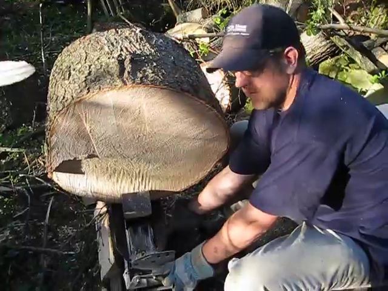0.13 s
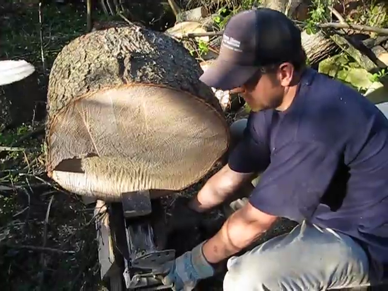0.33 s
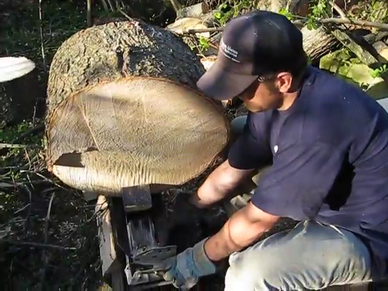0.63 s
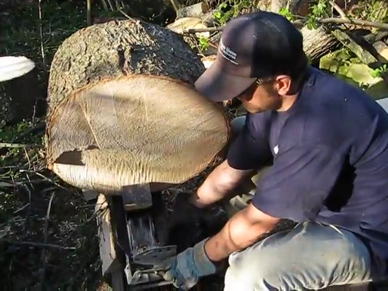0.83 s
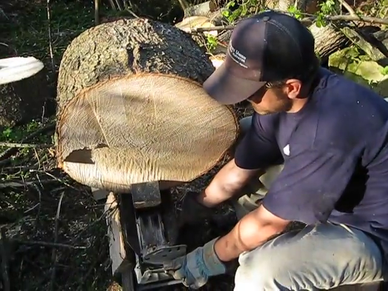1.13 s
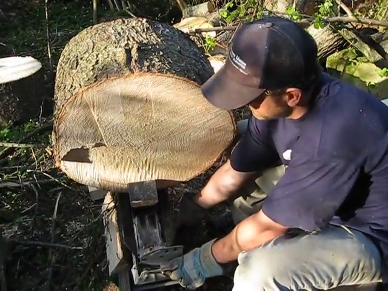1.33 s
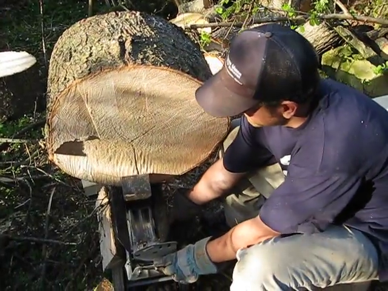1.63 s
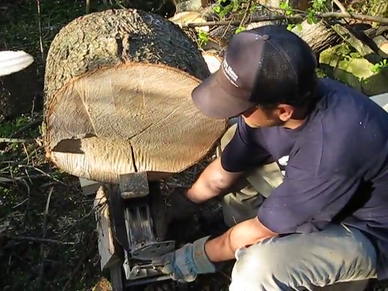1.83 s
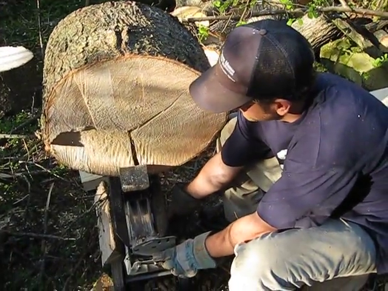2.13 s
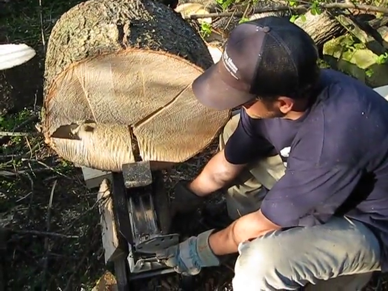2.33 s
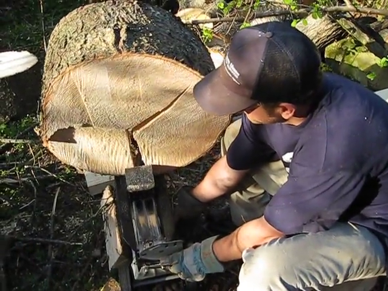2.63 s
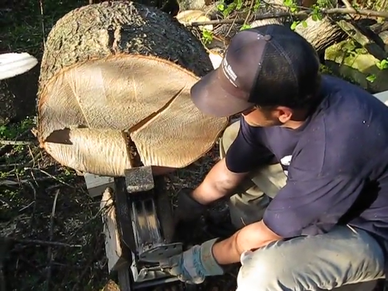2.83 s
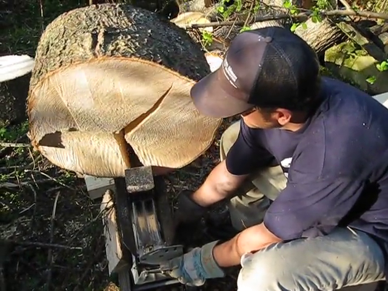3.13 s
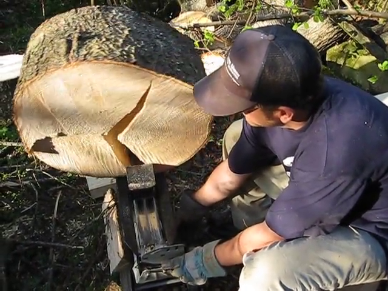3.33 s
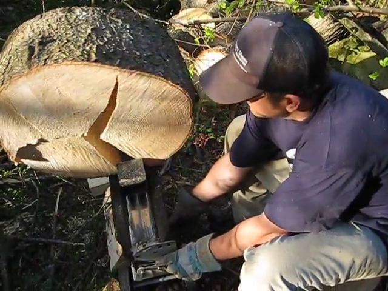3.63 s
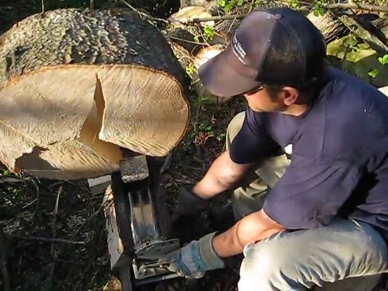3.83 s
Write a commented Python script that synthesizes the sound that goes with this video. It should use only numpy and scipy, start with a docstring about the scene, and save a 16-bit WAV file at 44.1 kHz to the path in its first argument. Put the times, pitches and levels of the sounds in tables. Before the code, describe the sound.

Log splitter pump whirs and rattles while a large log splits with sharp cracks and knocks

```python
"""A motor hum comes in over the low rush of a yard: an electric log splitter starts up.
Its gear pump spins up, whines and rattles as oil rushes through, then runs down; all follow one turning shaft.
The wedge tears a big log open: noise bursts and rings make sharp cracks, dull knocks and a short groan.
Dense random clicks make the crackle of fibres. The recorder's gain control ducks the sound after loud cracks."""
import sys
import numpy as np
from scipy import signal
from scipy.fft import rfft, irfft
from scipy.io import wavfile
from scipy.ndimage import uniform_filter1d, minimum_filter1d, map_coordinates

SR = 44100
rng = np.random.default_rng(int(sys.argv[2]) if len(sys.argv) > 2 else 0)


def bounce(signal):
    """Save signal as a 16-bit WAV file at the path given by the first command-line argument."""
    frames = np.transpose(np.atleast_2d(signal))
    limited = np.clip(frames, -1, 1)
    pcm = np.round(limited * 32767).astype(np.int16)
    wavfile.write(sys.argv[1], SR, pcm)


N = 176400  # samples in 4 seconds


def undb(db):
    """Turn decibels into a gain."""
    return 10 ** (np.asarray(db) / 20)


def unit(x):
    """Scale to an average (rms) level of 1."""
    return x / np.sqrt(np.mean(x ** 2))


def curve(rows, axis=1):
    """Join one column of a table by straight lines in time, holding the end values."""
    rows = np.array(rows)
    return np.interp(np.arange(N) / SR, rows[:, 0], rows[:, axis])


def colour(x, points):
    """Filter a sound to the given (Hz, dB) curve without any sound before its cause (minimum phase)."""
    size = 4096
    hz, db = np.array(points).T
    f = np.maximum(np.fft.rfftfreq(size, 1 / SR), 1)
    gain = undb(np.interp(np.log(f), np.log(hz), db))
    # folding the cepstrum forward in time gives the minimum-phase filter
    cepstrum = irfft(np.log(gain))
    cepstrum[1:size // 2] *= 2
    cepstrum[size // 2 + 1:] = 0
    impulse = irfft(np.exp(rfft(cepstrum)))
    return signal.fftconvolve(x, impulse)[:len(x)]


def ring(x, hz, width_hz):
    """Pass a sound through one resonance."""
    return signal.lfilter(*signal.iirpeak(hz, hz / width_hz, fs=SR), x)


def low_pass(x, hz, order):
    """Keep what lies below a frequency."""
    return signal.sosfilt(signal.butter(order, hz, fs=SR, output="sos"), x)


def noise():
    """White noise as long as the scene."""
    return rng.standard_normal(N)


def walk(rate):
    """Smooth random drift with an rms of 1, from this many new random values a second."""
    k = int(SR / rate)
    steps = np.repeat(noise()[:N // k + 1], k)
    smooth = uniform_filter1d(uniform_filter1d(steps, k), k)
    return unit(smooth[:N])


def waver(hz, width_hz):
    """A rough, unsteady ring: two slow noises carry the sine and cosine of a moving pitch."""
    phase = 2 * np.pi * np.cumsum(hz) / SR
    slow = lambda: unit(low_pass(noise(), width_hz, order=2))
    return slow() * np.sin(phase) + slow() * np.cos(phase)


def wood_ring(hz, width, t):
    """A ringing piece of wood whose phase strays at random, blurring its pitch by a share of itself."""
    stray = np.cumsum(rng.standard_normal(len(t))) * np.sqrt(2 * np.pi * width * hz / SR)
    return np.sqrt(2) * np.sin(2 * np.pi * hz * t + uniform_filter1d(stray, size=20))


# Whine at twice the gear mesh rate. Each row: time in seconds, level in dB before the resonance.
WHINE_LEVEL = [(.2, -70), (.24, -33), (.31, -40.5), (.34, -23), (.45, -22), (.56, -11), (.7, -8.5),
               (.92, -17.5), (1.28, -15), (1.42, -20.5), (1.62, -17), (1.85, -18.5), (2.5, -21),
               (2.84, -19.5), (3.1, -28), (3.65, -29.5), (3.82, -26.5), (3.885, -23.5), (3.95, -30),
               (4.0, -20)]
WHINE_PEAK_HZ, WHINE_WIDTH_HZ = 909, 268  # the resonance that picks out the whine
THIRD_DB = -12.5  # tone at three times the mesh rate, against the second, before the resonance
WHINE_FLUTTER_DB, SPIN_UP_FLUTTER_DB = 1.5, 9.5  # always there; added during spin-up
WHINE_WOBBLE_RAD = 0.062


def gear_whine(hz, shaft, mesh, unsteady):
    """Meshing teeth make tones that swell as they near a resonance and wobble with each shaft turn."""
    flutter = (WHINE_FLUTTER_DB + SPIN_UP_FLUTTER_DB * unsteady) * walk(rate=51)
    wobble = WHINE_WOBBLE_RAD * (np.sin(shaft) + np.cos(2 * shaft))

    def picked(order):
        resonance = np.exp(-((order * hz - WHINE_PEAK_HZ) / WHINE_WIDTH_HZ) ** 2)
        return np.sin(order * mesh + wobble) * resonance
    tones = picked(order=2) + undb(THIRD_DB) * picked(order=3)
    return np.sqrt(2) * tones * undb(curve(WHINE_LEVEL) + flutter)


# Gear tones. Each row: multiple of the mesh rate, level in dB against the rattle.
MESH_TONES = [(1, -7.5), (3, -15.5), (4, -19.5), (5, -12.5), (6, -9), (8, -22.5), (14, -24)]


def gear_tones(mesh):
    """Multiples of the rate at which teeth meet, each drifting in level on its own."""
    return sum(np.sqrt(2) * undb(db + 3.6 * walk(rate=6.34)) * np.sin(k * mesh) for k, db in MESH_TONES)


# Tone of the rattle. Each row: frequency in Hz, relative level in dB.
RATTLE_COLOUR = [(200, -48), (450, -3.5), (1050, 10), (1400, -3.5), (2300, -5), (2800, 7.5), (3500, 0.5),
                 (4100, -9.5), (6800, -9.5), (7600, -9.5), (8100, -19.5), (9200, -1.5), (11400, -9.5),
                 (12200, -14), (16000, -24.5)]
# Resonances of the pump housing: a list of frequencies in Hz.
HOUSING_RINGS = [3473, 8480, 8900, 10010, 10650, 11090]
HOUSING_WIDTH_HZ, HOUSING_DB = 110, 11


def gear_rattle(knocking):
    """Gears knock in a pattern that repeats every turn and rings the housing."""
    housing = sum(ring(knocking, f, HOUSING_WIDTH_HZ) * undb(2 * walk(rate=10.08)) for f in HOUSING_RINGS)
    return unit(colour(knocking + undb(HOUSING_DB) * housing, RATTLE_COLOUR))


# Tone of the rushing oil. Each row: frequency in Hz, relative level in dB.
OIL_COLOUR = [(60, -47), (200, -23), (300, 0), (470, -18.5), (640, 3.5), (850, 0.5), (1100, 6.5),
              (1400, -5), (2300, 3), (2900, 8), (3400, 1), (4000, -11), (5800, -5), (6700, -8.5),
              (7700, 1.5), (10800, -3), (12400, -16)]
SPURT_GAIN, SPURT_HZ = 0.825, 4450  # the repeating part of the hiss, and where it takes over
TOOTH_DEPTH = 0.35  # swell of the oil with each tooth
CASING_HZ, CASING_WIDTH_HZ, CASING_DB = 7738, 120, -7  # a casing resonance; level against the oil


def rushing_oil(wear, mesh):
    """Oil hisses in spurts, with treble that repeats every turn, and a casing resonance rings along."""
    spurts = wear * np.sign(np.sin(mesh))
    sharp_spurts = spurts - low_pass(spurts, SPURT_HZ, order=1)
    flow = low_pass(noise(), SPURT_HZ, order=1) + 0.3 * noise() + SPURT_GAIN * sharp_spurts
    oil = unit(colour(flow * (1 + TOOTH_DEPTH * np.sin(mesh)), OIL_COLOUR)) * undb(1.9 * walk(rate=29))
    casing = ring(wear + 0.65 * noise(), CASING_HZ, CASING_WIDTH_HZ)
    casing = unit(ring(casing, CASING_HZ, 2 * CASING_WIDTH_HZ))
    return oil + undb(CASING_DB) * casing


# Shaft tones that sing out late on. Each row: time in seconds, level of each tone in dB against the rattle.
SINGING_LEVEL = [(2.4, -16), (2.95, -16.5), (3.55, -0.5), (3.65, -9), (3.75, -6.5), (3.92, -6)]
# Pitches of these tones: a list of multiples of the shaft rate.
SINGING_MULTIPLES = (44, 45, 55, 56, 61)


def singing_tones(shaft):
    """High multiples of the shaft rate, each flickering in level on its own."""
    tones = sum(np.sqrt(2) * np.sin(k * shaft) * undb(2 * walk(rate=12)) for k in SINGING_MULTIPLES)
    return tones * undb(curve(SINGING_LEVEL))


# Pump speed. Each row: time in seconds, gear mesh rate in Hz.
PUMP_SPEED = [(.22, 327.8), (.33, 309.5), (.365, 500), (.39, 537), (.45, 547.6), (.55, 542.6), (.95, 535.3),
              (1.3, 528.6), (1.42, 537.9), (1.8, 541.4), (2.3, 544.9), (3.85, 544.1), (3.87, 453),
              (3.94, 346), (4.0, 252)]
# Pump levels. Each row: time in seconds, gear rattle in dB, rushing oil in dB.
PUMP_LEVELS = [(.15, -110, -110), (.23, -68, -50.5), (.29, -43, -60), (.37, -30.5, -26), (.48, -30, -33.5),
               (.6, -30.5, -35.5), (.9, -25.5, -35), (1.28, -32, -37), (1.42, -27, -31), (2.0, -31, -35),
               (2.8, -28, -26.5), (3.15, -31.5, -27.5), (3.6, -36.5, -25), (3.85, -32.5, -24.5),
               (3.94, -43.5, -31), (4.0, -40.5, -44)]
TEETH = 11
TURN_DEPTH = 0.36  # swell of the gears once a turn
SPEED_JITTER, SPIN_UP_JITTER = .00015, 0.02913  # shares of the speed: always there; added during spin-up
SPIN_UP_S = .5  # time by which the spin-up unsteadiness is gone


def pump():
    """One turning shaft drives gear whine, rattle, singing tones and spurting oil together."""
    t = np.arange(N) / SR
    unsteady = np.clip((SPIN_UP_S - t) / 0.088, 0, 1)
    hz = curve(PUMP_SPEED) * (1 + (SPEED_JITTER + SPIN_UP_JITTER * unsteady) * walk(rate=130))
    turns = np.cumsum(hz) / SR / TEETH
    shaft = 2 * np.pi * turns
    mesh = TEETH * shaft
    once_a_turn = 1 + TURN_DEPTH * np.sin(shaft)
    whine = gear_whine(hz, shaft, mesh, unsteady)
    gears = gear_tones(mesh) * once_a_turn
    # one random pattern, read again on every turn
    size = 800
    wear = map_coordinates(rng.standard_normal(size), [turns % 1 * size], order=5, mode="grid-wrap")
    gears = gears + gear_rattle(wear * once_a_turn)
    oil = rushing_oil(wear, mesh)
    gears = gears + singing_tones(shaft)
    return whine + gears * undb(curve(PUMP_LEVELS)) + oil * undb(curve(PUMP_LEVELS, axis=2))


# Oil squealing as the valve opens and shuts. Each row: time in seconds, level in dB.
VALVE_LEVEL = [(.2, -52), (.3, -33.5), (.345, -19.5), (.48, -27.5), (.58, -35), (3.8, -45), (3.9, -37),
               (3.95, -58)]


def valve():
    """Oil squeals through the valve in a rough tone at twice the gear mesh rate."""
    return waver(2 * curve(PUMP_SPEED), width_hz=115) * undb(curve(VALVE_LEVEL))


# Motor hum. Each row: time in seconds, level in dB.
HUM_LEVEL = [(.02, -140.5), (.045, -37.5), (.41, -38), (.56, -48.5), (.92, -40), (1.25, -56), (2.5, -62),
             (3.7, -47.5), (4.0, -63)]
# Tones in the hum. Each row: multiple of the hum's pitch, level in dB against the hum level.
HUM_TONES = [(1, -5.5), (2, -12), (3, -11.5), (4, -8.5), (5, -17)]
HUM_START_HZ, HUM_RUN_HZ = 113, 117.5


def motor():
    """The motor hums in a stack of tones, strongest at the start and again near one second."""
    pitch = curve([(.15, HUM_START_HZ), (.35, HUM_RUN_HZ)])
    phase = 2 * np.pi * np.cumsum(pitch) / SR
    tones = sum(undb(db + 1.2 * walk(rate=4.48)) * np.sin(k * phase) for k, db in HUM_TONES)
    return np.sqrt(2) * undb(curve(HUM_LEVEL)) * tones


# Splinters snapping. Each row: start in seconds, level in dB, ring in Hz.
SPLINTERS = [(.301, -20, 2730), (1.089, -21, 2450), (1.3097, -12, 2470), (1.404, -12.5, 2420),
             (1.469, -11.5, 3100), (1.4742, -1, 3130), (1.4785, -6, 2920), (1.5873, -16.5, 5505),
             (1.609, -12.5, 3014), (1.6116, -10.5, 2697), (1.6288, -12.5, 4930), (1.639, -13, 2960),
             (1.6655, -1, 2480), (1.737, -11.5, 2490), (1.7621, -16.5, 3400), (1.8514, -14.5, 6360),
             (1.8727, -2.5, 3110), (1.9168, -3.5, 2900), (1.9265, -5, 3110), (1.9617, -8.5, 3240),
             (1.994, -8.5, 2925), (2.032, -8, 4660), (2.0854, -10, 4890), (2.0942, 0.5, 4330),
             (2.12, -7, 2700), (2.132, -6.5, 5830), (2.179, -6.5, 2790), (2.2462, 0, 2660),
             (2.255, -2, 3070), (2.2686, -6.5, 4300), (2.3487, -20, 5540), (2.3612, -4.5, 3440),
             (2.382, -10, 5394), (2.4326, 0, 5110), (2.5171, -2, 5560), (2.5822, -7.5, 3074),
             (2.6067, -13, 3473), (2.6267, 6, 2800), (2.887, -5, 3487), (3.1789, -16, 4510),
             (3.3565, -12.5, 3020), (3.384, -18, 3472), (3.7661, -9, 4444)]
# Tone of splintering wood. Each row: frequency in Hz, relative level in dB.
SPLINTER_COLOUR = [(300, -13.5), (1000, 1), (3000, 7), (6000, 0), (10000, -1.5), (16000, -16)]
SNAP_S, SNAP_DOUBLING_DB = 0.0013, 26.5  # time to the peak of a 0 dB snap; this much louder lasts twice as long
SNAP_WIDTH, SNAP_RING_DB, SNAP_RING_CYCLES = 0.058, -2.5, 4.73  # pitch blur; against the tear; to the peak
TAIL_S, TAIL_DB = .02, -20


def snaps():
    """Each splinter tears in a brief burst of noise with a faint tail; low-pitched ones ring longer."""
    out, t = np.zeros(N + SR), np.arange(SR // 10) / SR
    burst = lambda age: age * np.exp((1 - age ** 2) / 2)  # swells to 1 at age 1, then stops quickly
    for at, db, hz in SPLINTERS:
        age = t / (SNAP_S * 2 ** (db / SNAP_DOUBLING_DB))
        tail = undb(TAIL_DB) * np.minimum(age, 1) * np.exp(-t / TAIL_S)
        tear = (burst(age) + tail) * unit(colour(rng.standard_normal(len(t)), SPLINTER_COLOUR))
        ringing = undb(SNAP_RING_DB) * burst(t * hz / SNAP_RING_CYCLES) * wood_ring(hz, SNAP_WIDTH, t)
        start = int(at * SR)
        out[start:start + len(t)] += undb(db) * (tear + ringing) / np.sqrt(2)
    return out[:N]


# Knocks of the log's body. Each row: start in seconds, level in dB, ring in Hz, decay in milliseconds.
LOG_KNOCKS = [(1.089, -13, 603, 2), (1.188, -18.5, 1400, 6), (1.308, -1.5, 652, 4.1),
              (1.405, -6.5, 910, 2.9), (1.436, -11.5, 880, 4), (1.473, -2.5, 1290, 6.7),
              (1.48, -2, 972, 9.8), (1.612, -10, 1102, 4.6), (1.6665, -2, 1184, 5.1),
              (1.9622, 2.5, 982, 7.9), (2.043, -13.5, 925, 8.6), (2.107, 0, 1145, 6.5),
              (2.1794, -6.5, 986, 7.2), (2.225, -12.5, 971, 9.7), (2.2463, 7, 785, 2.6),
              (2.2549, 2.5, 940, 7.4), (2.6256, -3.5, 681, 10.5), (3.3571, -13.5, 770, 4.46),
              (3.897, -14, 714, 5.56)]
# Tone of the blow through the log. Each row: frequency in Hz, relative level in dB.
THUD_COLOUR = [(40, -28.5), (700, 2), (1600, 1), (4000, -27.5)]
KNOCK_WIDTH, KNOCK_THUD_DB, ATTACK_S = 0.058, -1.5, 0.0012  # pitch blur; thud against the ring; rise time


def knocks():
    """A deep break thuds through the log and leaves it ringing briefly."""
    out, t = np.zeros(N + SR), np.arange(SR // 10) / SR
    for at, db, hz, decay_ms in LOG_KNOCKS:
        envelope = (1 - np.exp(-t / ATTACK_S)) * np.exp(-t / (decay_ms / 1000))
        thud = unit(colour(rng.standard_normal(len(t)), THUD_COLOUR))
        body = unit(wood_ring(hz, KNOCK_WIDTH, t) + undb(KNOCK_THUD_DB) * thud)
        start = int(at * SR)
        out[start:start + len(t)] += undb(db) * envelope * body
    return out[:N]


# Groan after the log's first break. Each row: time in seconds, pitch in Hz, level in dB.
LOG_GROAN = [(1.305, 372.6, -88), (1.313, 335, -9), (1.345, 203, -31), (1.43, 210, -46), (1.6, 258, -81)]


def groan():
    """The log groans in a rough tone whose pitch drops fast, then creeps up as it fades."""
    return waver(curve(LOG_GROAN), width_hz=66) * undb(curve(LOG_GROAN, axis=2))


# Tearing fibres. Each row: time in seconds, level in dB.
TEARING_LEVEL = [(1.29, -75), (1.33, -35), (1.41, -26), (1.65, -29), (1.95, -35), (2.08, -26), (2.35, -35),
                 (2.61, -29), (2.7, -44), (3.5, -39)]
# Tone of the fibres. Each row: frequency in Hz, relative level in dB.
FIBRE_COLOUR = [(100, -31), (300, -7), (800, 3), (1600, 1.5), (3000, -3), (4000, -13), (16000, -34)]
FIBRES_PER_S, FIBRE_SPREAD_DB = 420, 2.6
TICKS_PER_S, TICK_DB = 70, -5  # thin splinters; level against the fibres


def fibres():
    """Small fibres let go in a dense crackle of random clicks, with bright ticks of thin splinters among them."""
    sizes = undb(FIBRE_SPREAD_DB * np.minimum(rng.exponential(size=N), 3)) * np.sign(noise())
    t = np.arange(SR // 50) / SR

    def crackle(per_s, points):
        clicks = (rng.random(N) < per_s / SR) * sizes
        wood = rng.standard_normal(len(t)) * np.exp(-t / .0006)
        return unit(colour(signal.fftconvolve(clicks, wood)[:N], points))
    tearing = crackle(FIBRES_PER_S, FIBRE_COLOUR)
    ticks = undb(TICK_DB) * crackle(TICKS_PER_S, SPLINTER_COLOUR)
    return (tearing + ticks) * undb(curve(TEARING_LEVEL))


# Tone of the yard. Each row: frequency in Hz, relative level in dB.
YARD_COLOUR = [(30, -11), (110, -4), (440, 3.5), (700, -6.5), (2100, -8), (4000, -19.5), (15000, -29.5)]
YARD_DB = -44.679


def yard():
    """The low rush of the yard: coloured noise that fades in quickly at the start."""
    fade_in = curve([(.025, 0), (.04, 1)])
    return unit(colour(noise(), YARD_COLOUR)) * undb(YARD_DB) * fade_in


def scene():
    """Machine and log over the low rush of the yard."""
    background = yard()
    squeal = valve()
    log_groan = groan()
    machine = pump() + squeal + motor()
    log = snaps() + knocks() + log_groan + fibres()
    return (machine + log + background)[None]


MIC_DIP_HZ, MIC_DIP_WIDTH_HZ, MIC_DIP_DEPTH = 1996, 104, 0.86  # a narrow dip; depth as a share removed
AGC_DB, AGC_WINDOW_S = -15.5, 0.0071  # short-term level above which the gain drops
AGC_ATTACK_S, AGC_HOLD_S, AGC_RELEASE_DB_S = 0.0033, 0.023, 197
CEILING, TOP_HZ = .75, 16000  # peak limit ahead of the top cut


def record(dry):
    """A narrow dip, gain control that holds and recovers, a fast peak limiter and the top cut."""
    x = dry[0] - MIC_DIP_DEPTH * ring(dry[0], MIC_DIP_HZ, MIC_DIP_WIDTH_HZ)
    # the shifted windows look only at the past
    window, hold = int(AGC_WINDOW_S * SR), int(AGC_HOLD_S * SR)
    power = uniform_filter1d(x ** 2, window, origin=(window - 1) // 2)
    wanted_db = np.minimum(AGC_DB - 10 * np.log10(np.abs(power) + 1e-12), 0)
    held_db = minimum_filter1d(wanted_db, hold, origin=(hold - 1) // 2)
    # the gain may drop at once but climbs no faster than this ramp; the attack then smooths it
    ramp = AGC_RELEASE_DB_S * np.arange(N) / SR
    released_db = np.minimum.accumulate(held_db - ramp) + ramp
    step = 1 / (AGC_ATTACK_S * SR)
    x = x * undb(signal.lfilter([step], [1, step - 1], released_db))
    size = 45  # limiter window in samples
    peak_gain = minimum_filter1d(CEILING / np.maximum(np.abs(x), CEILING), size)
    x = x * uniform_filter1d(peak_gain, size)
    return signal.sosfilt(signal.ellip(10, .2, 80, TOP_HZ, fs=SR, output="sos"), x)[None]


dry = scene()
out = record(dry)
bounce(out)
```